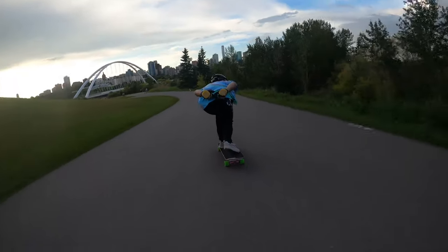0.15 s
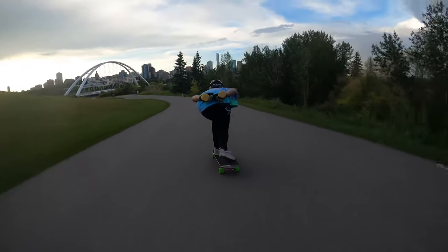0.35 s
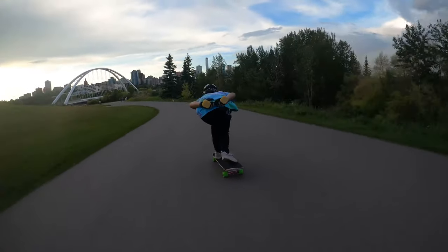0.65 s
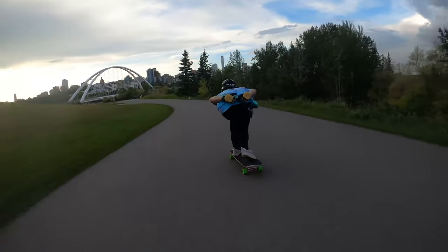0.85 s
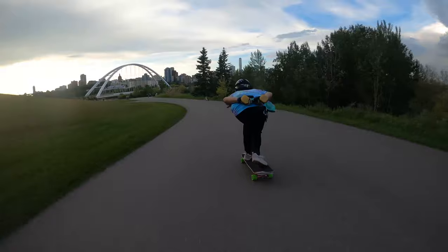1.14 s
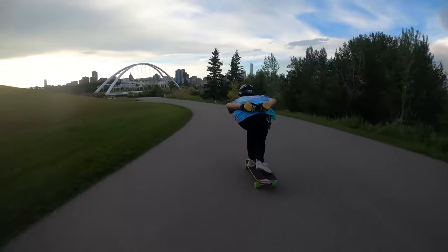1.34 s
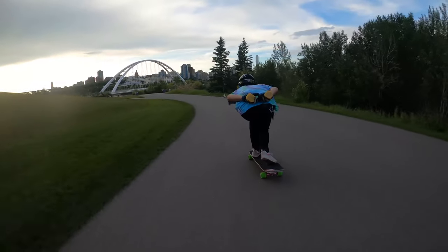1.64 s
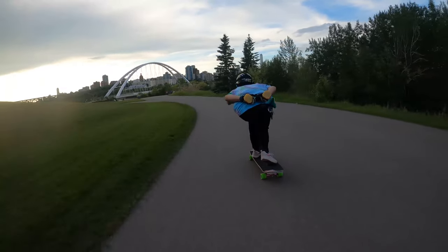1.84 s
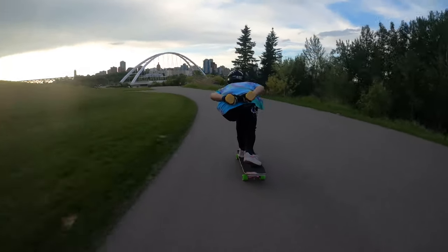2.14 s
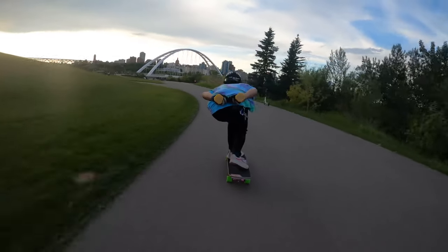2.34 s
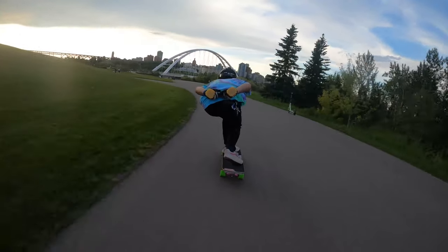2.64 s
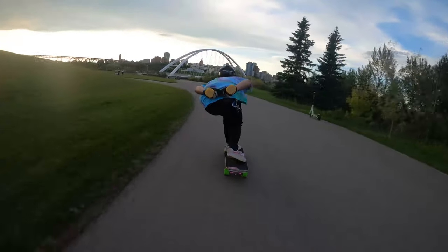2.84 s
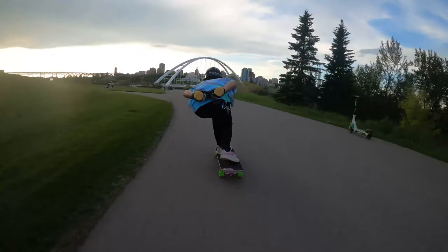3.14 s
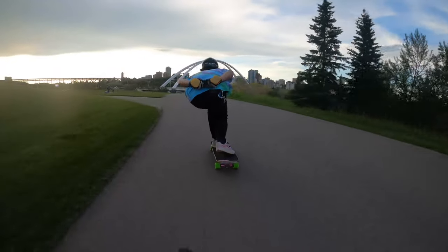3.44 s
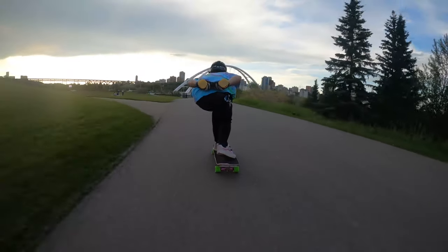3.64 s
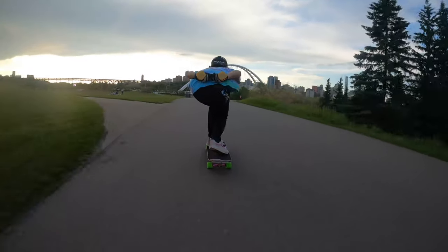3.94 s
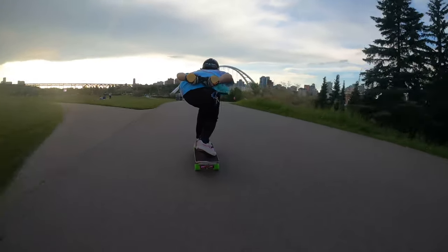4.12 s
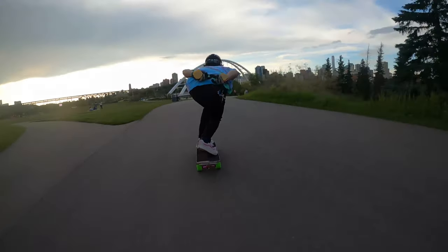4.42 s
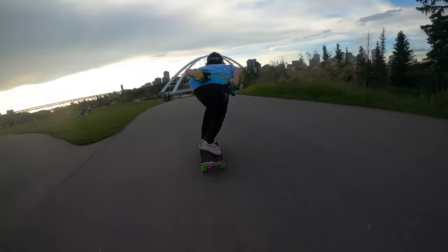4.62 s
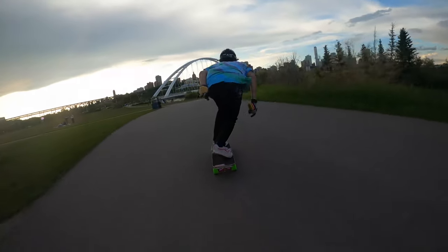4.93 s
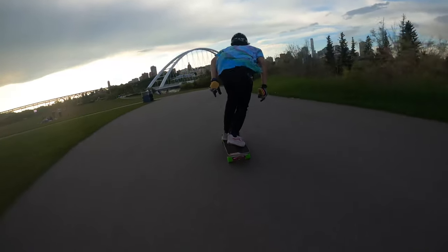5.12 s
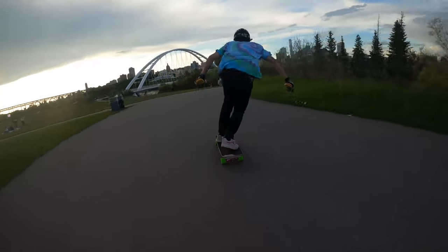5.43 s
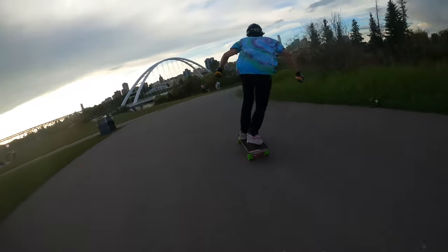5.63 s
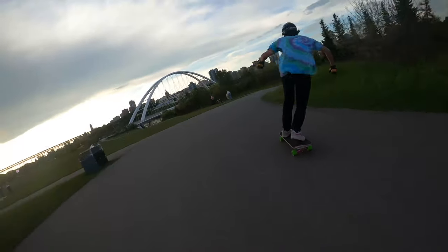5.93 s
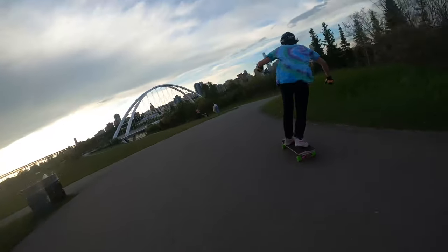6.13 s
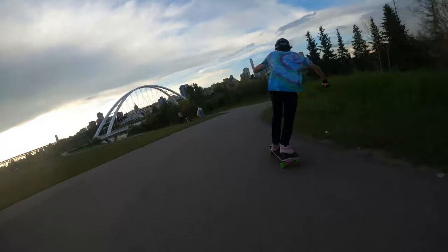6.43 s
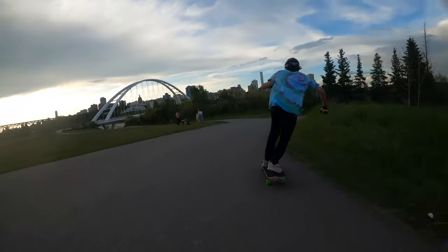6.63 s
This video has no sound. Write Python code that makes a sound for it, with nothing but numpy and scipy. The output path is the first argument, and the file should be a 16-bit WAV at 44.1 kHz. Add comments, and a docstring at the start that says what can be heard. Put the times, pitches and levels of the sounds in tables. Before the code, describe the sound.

Fast longboard wheels on rough asphalt make a continuous, hollow roar with a thin hiss and low hum. Wind hits the small moving camera's microphone throughout: fluttering with brighter gusty rushes in the first second, easing a little, then heavy low thumps in the middle, another rushing gust past five seconds, and looser buffets to the end. Open air, close stereo, no echo.

```python
"""Longboard at speed in a headwind

Urethane longboard wheels roar over coarse asphalt, heard by a small camera that rides along.
The roar, rasp and hiss are patchy noise, coloured by the cavity resonances of two microphone ports.
A low wheel hum and a resonant deck drone lie beneath; a faint fizz of fine grit flickers on top.
Headwind is lumpy noise that rumbles, flutters and flaps in buffets; side gusts add a brighter rush."""
import sys
import numpy as np
from scipy import signal
from scipy.fft import rfft, irfft, next_fast_len
from scipy.io import wavfile
from scipy.ndimage import uniform_filter1d, map_coordinates

SR = 44100
rng = np.random.default_rng(int(sys.argv[2]) if len(sys.argv) > 2 else 0)


def store_wav(level_fs):
    """Save 16-bit WAV to argv[1]."""
    pcm = np.round(np.clip(np.atleast_2d(level_fs), -1, 1) * 32767)
    wavfile.write(sys.argv[1], SR, pcm.T.astype(np.int16))


N = 298557


def amp(db):
    """Amplitude for a level in dB."""
    return 10 ** (np.asarray(db) / 20)


def unit(x):
    """x scaled to an rms of 1."""
    return x / np.sqrt(np.mean(x ** 2) + 1e-20)


def along(points, hz):
    """(Hz, value) points read on a logarithmic frequency axis."""
    point_hz, values = np.transpose(points)
    return np.interp(np.log(hz + 1), np.log(point_hz + 1), values)


def curves(rows):
    """One value per sample for each column after the time."""
    s, *columns = np.transpose(rows)
    return [np.interp(np.arange(N) / SR, s, column) for column in columns]


def wobble(rate):
    """A smooth random curve with rate knots a second."""
    knots = rng.standard_normal(int(N * rate / SR) + 4)
    return map_coordinates(knots, [np.arange(N) * rate / SR])


def filtered(x, response):
    """x through a complex response of frequency, padded so that its tail does not wrap round."""
    size = next_fast_len(N + SR // 2)
    return irfft(rfft(x, size) * response(np.fft.rfftfreq(size, 1 / SR)), size)[..., :N]


def pair(x, alike):
    """Two unrelated signals mixed to left and right with the correlation alike(Hz)."""
    def mid_and_side(hz):
        turn = np.arccos(np.clip(alike(hz), -1, 1)) / 2
        return np.array([np.cos(turn), np.sin(turn)])

    mid, side = filtered(x, mid_and_side)
    return np.array([mid + side, mid - side])


def puffs(spectrum, alike, lumps_db):
    """Stereo noise of rms 1 that comes in lumps."""
    lumpy = amp(lumps_db) * rng.standard_normal((2, N))
    noise = pair(lumpy, lambda hz: alike + 0 * hz)
    return unit(filtered(noise, lambda hz: amp(along(spectrum, hz))))


def joined(*levels_db):
    """Levels of sounds that play together, summed as powers."""
    return 10 * np.log10(sum(amp(db) ** 2 for db in levels_db))


def milliseconds():
    """A column of times in seconds, one every millisecond."""
    return np.arange(0, N / SR, .001)[:, None]


def per_sample(ms_values):
    """Values given every millisecond, read once a sample."""
    return np.interp(np.arange(N) * 1000 / SR, np.arange(len(ms_values)), ms_values)


def bells(peak_s, length_s):
    """Bell-shaped swells, one column each; the length is the width at half height."""
    return np.exp(-4 * np.log(2) * ((milliseconds() - peak_s) / length_s) ** 2)


def random_field(shape, bins, frames):
    """Random gains over frequency and time, smoothed over some bins and frames, rms 1."""
    field = uniform_filter1d(rng.standard_normal(shape), size=bins, axis=0)
    return unit(uniform_filter1d(field, size=frames, axis=1))


def lean(hz, shift, centre_hz, span_hz):
    """A tilt around a centre: a positive shift lifts the upper flank and lowers the other."""
    side = (hz[:, None] - centre_hz) / span_hz
    return shift * side * np.exp(-side ** 2 / 2)


# Where the hiss resonance leans. Each row: time in seconds, nominal centre in Hz.
HISS_CENTRE = [(0.0, 3150), (0.07, 3340), (0.13, 3140), (0.38, 3220), (0.41, 3080), (0.7, 3220),
               (1.02, 3240), (1.11, 3030), (1.15, 3260), (1.26, 3070), (1.68, 3220), (3.81, 3120),
               (5.09, 3250), (5.37, 3150), (5.79, 3330), (6.77, 3080)]


def road(patchy_db, centre_hz):
    """Dense stone impacts under four wheels: patchy noise whose roar and hiss lean with their centres."""
    hz, t, z = signal.stft(rng.standard_normal((2, N)), SR, nperseg=512)
    patches_db = patchy_db * random_field(z.shape[1:], bins=6, frames=10)
    roar_shift = (np.interp(t, np.arange(N) / SR, centre_hz) - 1040) / 100
    hiss_shift = (np.interp(t, *np.transpose(HISS_CENTRE)) - 3200) / 100
    lean_db = lean(hz, 7 * roar_shift, 1050, 280) + lean(hz, 2.5 * hiss_shift, 3200, 420)
    return signal.istft(z * amp(patches_db + lean_db), SR, nperseg=512)[1][:, :N]


# Wavering strands in the roar, and the same in the hiss resonance: depth, centre, reach.
STRAND_DB, STRAND_HZ, STRAND_SPAN_HZ = 1.5, 1040, 340
RING_DB, RING_HZ, RING_SPAN_HZ = 2, 3200, 500


def strands(x):
    """Narrow, slowly wandering ridges of gain in roar and hiss, as the wheels' tread rings unevenly."""
    hz, _, z = signal.stft(x, SR, nperseg=2048)
    ridges = random_field(z.shape[1:], bins=2, frames=5)

    def bell(centre, span):
        return np.exp(-((hz[:, None] - centre) / span) ** 2)

    depth_db = STRAND_DB * bell(STRAND_HZ, STRAND_SPAN_HZ) + RING_DB * bell(RING_HZ, RING_SPAN_HZ)
    return signal.istft(z * amp(depth_db * ridges), SR, nperseg=2048)[1][:, :N]


# Wheel noise as each port hears it. Each row: frequency in Hz, relative level in dB per Hz.
LEFT_PORT = [(500, -39.5), (780, -8.5), (900, -2.5), (975, 0), (1065, -1.5), (1160, -1), (1260, -7),
             (1500, -19), (1800, -34.5), (2239, -30), (2550, -26), (2800, -20.5), (3030, -22.5),
             (3330, -19.5), (3500, -23.5), (3780, -31), (4306, -37), (4700, -38.5), (5200, -39.5),
             (5600, -41.5), (6029, -46), (6800, -47.5), (7665, -49.5), (8354, -62.5), (10000, -73),
             (14500, -105)]
RIGHT_PORT = [(500, -47.5), (780, -12), (900, -4), (975, -2), (1065, -3), (1160, -3), (1260, -9),
              (1600, -25), (2067, -24.5), (2497, -46.5), (2850, -35.5), (3350, -33), (3780, -36),
              (4134, -38.5), (4600, -31.5), (4995, -30.5), (5200, -33.5), (5450, -38.5), (6029, -46),
              (6804, -48), (7924, -74), (10000, -79.5), (14500, -105)]
# Phase between the ports. Each row: frequency in Hz, lead of the left port in radians.
PORT_LEAD = [(500, .1), (800, .2), (1810, 0), (2330, -1.7), (2580, -1.8), (3530, .2), (4130, .5),
             (5430, 3.8), (5700, 6.28)]
# Likeness of the ports' noise. Each row: frequency in Hz, left-right correlation before the phase lead.
PORT_ALIKE = [(700, 1), (1750, .96), (2150, .7), (2600, .93), (3600, .94), (4250, .55), (4700, .72),
              (5300, .45), (5750, 1), (6600, .97), (7500, .35)]


def through_ports(x):
    """Each port's cavity resonance colours the wheel noise, with a phase lead between the two."""
    def ports(hz):
        colour = amp([along(LEFT_PORT, hz), along(RIGHT_PORT, hz)])
        return colour * np.exp(.5j * np.outer([1, -1], along(PORT_LEAD, hz)))

    return filtered(pair(x, lambda hz: along(PORT_ALIKE, hz)), ports)


# Loose grit spat from under the wheels. Each row: peak in seconds, rise of the hiss in dB (minus dips).
SPITS = [(.055, 2), (.19, -2), (.307, 3.5), (.487, 2.5), (.802, 4), (.93, 3), (1.317, 5.5), (1.948, 5),
         (2.802, 3.5), (3.452, 2.5), (4.676, 7), (4.975, 4), (5.828, 6), (5.9, 3), (6.203, -2), (6.472, 5),
         (6.601, 7)]
SPIT_S = .02


def spits():
    """Short swishes of spat grit: brief changes of the hiss level, in dB."""
    s, rise_db = np.transpose(SPITS)
    return per_sample(bells(s, SPIT_S) @ rise_db)


# Lower edge of the hiss over the rest. Each row: time in seconds, gain in dB.
SHOULDER = [(0, -2), (.5, 2), (.9, -1.5), (1.3, -2), (2, -0.5), (2.4, -2), (2.8, 0), (3.6, 0), (4.6, -2.5),
            (5.5, -1.5), (6, 0), (6.4, 1.5), (6.77, -2.5)]
# Top of the hiss over the rest. Each row: time in seconds, gain in dB.
SHEEN = [(0, 0), (.3, 1.5), (0.7, 1.5), (1.2, -0.5), (2.2, 5), (2.8, 2), (3.5, 5), (4.6, 1.5), (5, 0.5),
         (5.4, 4.5), (5.75, 0.5), (6.1, -2), (6.77, 2.5)]


def hiss(heard, below):
    """The treble of the wheel noise, its lower edge and top moving apart from its body."""
    top = heard - below(3900)
    body = heard - below(2290) - top
    edge = below(3000) - below(2265)
    body = body + (amp(*curves(SHOULDER)) - 1) * edge
    return unit(amp(spits()) * body + amp(*curves(SHEEN)) * top)


# Deck drone while rolling. Each row: time in seconds, level in dB midway between the two ports.
DRONE = [(0.0, -35), (0.28, -40), (1.39, -50), (2.13, -54), (4.83, -39.5), (5.45, -37), (6.13, -33.5),
         (6.4, -32), (6.47, -22), (6.53, -30.5), (6.77, -33)]
DECK_HZ, DECK_WIDTH_HZ = 596, 120  # resonance of the wooden deck
DECK_SHAKEN_DB = -26  # what the flaps add to the drone, relative to their own level


def deck_drone():
    """The wooden deck rings as a resonance on noise, in phase at both ports and slightly louder on the left."""
    def resonance(hz):
        damping = 1j * hz * DECK_WIDTH_HZ
        return (damping / (DECK_HZ ** 2 - hz * hz + damping)) ** 2

    _, _, flap_db = buffets()
    level_db = joined(*curves(DRONE), flap_db + DECK_SHAKEN_DB)
    drone = unit(filtered(rng.standard_normal(N), resonance))
    return amp(level_db + 0.99 * wobble(8)) * drone * amp([[.8], [-.8]])  # left and right gains in dB


# Spectrum of the low hum. Each row: frequency in Hz, relative level in dB per Hz.
HUM = [(150, -39), (300, -2), (450, 1.5), (650, -5.5), (850, -14), (1500, -64)]
# Strength of the hum. Each row: time in seconds, level in dB.
HUM_LEVEL = [(0, -31), (1.1, -33.5), (1.6, -34), (2.3, -33), (3.3, -34), (3.9, -33), (4.03, -31),
             (4.4, -37), (4.54, -36.5), (4.8, -39), (5.6, -31.5), (5.9, -37.5), (6.4, -38.5), (6.77, -30.5)]


def hum(texture_db):
    """Low hum of the rolling wheels: band-shaped noise, the same at both ports."""
    level_db, = curves(HUM_LEVEL)
    return amp(level_db + texture_db) * puffs(HUM, 1.0, lumps_db=0.54 * wobble(25))


# Rolling. Each row: time in seconds, roar level in dB, nominal centre the roar leans towards in Hz,
# rasp level in dB, hiss level in dB.
ROLL = [(0.0, -21, 1064, -30.5, -35.5), (0.26, -23, 1068, -46.5, -40), (0.7, -20.5, 1103, -43, -41),
        (0.82, -23, 1052, -40, -38.5), (1.13, -24, 1060, -40, -39), (1.21, -23, 1040, -39, -36),
        (1.34, -19.5, 1033, -37.5, -38), (1.45, -23.5, 1030, -37, -37), (1.6, -22, 1028, -36.5, -37.5),
        (1.95, -23, 1010, -38, -39), (2.4, -24, 950, -32, -40), (2.52, -23.5, 970, -32, -39),
        (2.58, -23, 1045, -33, -37), (2.95, -21, 986, -31.5, -37), (3.18, -21, 1028, -35.5, -41),
        (3.51, -22, 1070, -36.5, -40.5), (4.16, -21, 1090, -40, -40), (4.56, -24, 1022, -39.5, -39),
        (4.84, -26, 985, -38, -40.5), (4.97, -22.5, 1027, -34, -38), (5.3, -22.5, 1060, -44.5, -42.5),
        (5.47, -21, 1083, -45, -42), (5.57, -20, 1087, -40, -41), (5.68, -22, 1105, -39, -39),
        (5.82, -23, 1077, -37.5, -38), (6.1, -21, 1100, -36, -37.5), (6.3, -19.5, 1095, -36, -37.5),
        (6.48, -21.5, 1076, -33.5, -38.5), (6.77, -22, 1040, -34.5, -41.5)]


def wheels():
    """Roar, rasp and hiss of the tyres through the two ports, with the deck and the hum along."""
    roar_db, centre_hz, rasp_db, hiss_db = curves(ROLL)
    heard = through_ports(strands(road(0.74, centre_hz)))

    def below(edge_hz):
        return filtered(heard, lambda hz: 1 / (1 + (hz / edge_hz) ** 12))

    texture_db = 0.097 * wobble(17) + 0.24 * wobble(30)  # coarser and finer stretches of asphalt
    roar = amp(roar_db + texture_db) * unit(below(1403))
    rasp = amp(rasp_db + texture_db) * unit(below(1996) - below(1442))
    hissing = amp(hiss_db + texture_db + 0.37 * wobble(9.8)) * hiss(heard, below)
    return roar + hissing + rasp + deck_drone() + hum(texture_db)


# Wind buffets. Each row: peak in seconds, length in seconds (width at half power), rumble level in dB,
# flutter level in dB, flap level in dB.
BUFFETS = [(0.061, 0.026, -15, -21, -26), (0.125, 0.07, -17.5, -37, -37), (0.182, 0.018, -13, -27, -17),
           (0.246, 0.028, -22, -14, -26), (0.375, 0.055, -35, -17.5, -27), (0.434, 0.016, -30, -21, -22),
           (0.491, 0.018, -28, -14, -20.5), (0.637, 0.041, -23, -23, -27), (0.763, .025, -28, -25, -24),
           (0.88, 0.03, -27, -11, -21.5), (0.958, 0.019, -21, -22, -21), (0.996, 0.014, -21, -18, -19),
           (1.092, 0.041, -23, -16, -20.5), (1.366, 0.033, -19, -19, -31), (1.523, 0.13, -15, -32, -29),
           (1.724, 0.057, -16, -18, -25.5), (2.044, 0.058, -18, -22.5, -27),
           (2.287, 0.055, -26, -26.5, -22.5), (2.375, .035, -23, -24, -23), (2.454, 0.064, -25, -22, -21.5),
           (2.512, 0.037, -26, -29, -18.5), (2.632, 0.044, -12.5, -26, -26), (2.71, 0.028, -20, -33, -32),
           (2.828, 0.032, -14, -31, -23), (2.895, 0.061, -18.5, -29, -21), (2.963, 0.034, -13, -29, -23.5),
           (3.06, 0.013, -11.5, -17, -29), (3.126, 0.031, -10, -30, -18), (3.188, 0.035, -28, -19.5, -18),
           (3.317, 0.044, -14, -24.5, -26.5), (3.365, 0.039, -10, -16, -18.5), (3.41, 0.022, -18, -21, -36),
           (3.459, 0.023, -18, -10, -16), (3.516, 0.021, -20, -14.5, -17.5), (3.594, 0.03, -10, -28, -18),
           (3.699, 0.047, -15, -16, -20.5), (3.799, 0.026, -12.5, -16, -21.5),
           (3.867, 0.045, -20, -23, -22), (3.963, 0.032, -13.5, -18.5, -22.5),
           (4.082, 0.034, -14, -17.5, -28.5), (4.196, 0.019, -9, -21, -20),
           (4.248, 0.027, -19.5, -11.5, -18), (4.328, 0.04, -12, -17.5, -15),
           (4.42, 0.055, -15.5, -22, -16), (4.474, 0.034, -16.5, -20, -19),
           (4.603, 0.07, -16.5, -22, -22.5), (4.714, 0.04, -17, -24, -21),
           (4.837, 0.056, -18.5, -19, -25.5), (4.986, 0.033, -11, -21, -25), (5.02, .025, -36, -28, -29),
           (5.14, 0.068, -14, -23, -27), (5.257, 0.074, -33, -18, -20.5), (5.354, 0.063, -18, -19, -24),
           (5.47, 0.13, -31, -16, -21), (5.694, 0.039, -23, -27, -29), (5.745, 0.016, -31, -25, -23.5),
           (6.09, 0.063, -21, -24, -30.5), (6.25, .08, -23, -29.5, -32), (6.46, 0.032, -14, -22.5, -26.5),
           (6.53, 0.02, -18, -18.5, -34), (6.628, 0.035, -19, -18, -26.5), (6.692, 0.021, -20, -23, -26),
           (6.747, 0.044, -18, -23.5, -24)]


def buffets():
    """Rumble, flutter and flap levels of the buffets, each a bell-shaped swell of power."""
    s, length, *levels_db = np.transpose(BUFFETS)
    swells = bells(s, length)
    return [per_sample(10 * np.log10(swells @ amp(db) ** 2 + 1e-12)) for db in levels_db]


# Side gusts. Each row: start in seconds, length in seconds, rush level in dB.
GUST = [(0.0, 0.085, -39), (0.045, .02, -31), (0.315, 0.5, -33.5), (0.81, 0.33, -41), (0.096, 0.17, -28),
        (0.322, 0.035, -25.5), (0.395, 0.043, -27.5), (0.48, 0.028, -22.5), (0.508, 0.024, -22.5),
        (0.554, .13, -30), (0.61, 0.015, -31), (0.638, 0.043, -24.5), (0.695, 0.016, -28),
        (0.749, 0.031, -22.5), (0.853, 0.032, -26), (0.88, .03, -29.5), (0.946, .022, -30),
        (0.982, .025, -31), (1.084, 0.021, -24.5), (1.122, .015, -29), (1.32, 0.019, -34),
        (1.5, 0.017, -35), (1.654, .025, -39), (2.107, 0.011, -39), (2.295, .02, -37), (2.563, 0.045, -41),
        (2.712, 0.029, -39), (2.966, .04, -35), (3.17, 0.045, -31), (3.585, 0.017, -29), (3.96, 0.018, -26),
        (4.326, 0.021, -26), (4.428, 0.011, -28), (4.464, 0.011, -25), (4.713, 0.026, -24),
        (4.827, 0.027, -43), (4.95, .09, -32), (4.99, 0.02, -28), (5.087, 0.056, -31.5),
        (5.193, 0.12, -28.5), (5.294, 0.019, -28), (5.343, 0.47, -27.5), (5.47, 0.29, -31),
        (5.5, .045, -30), (5.62, 0.04, -32)]
GUST_EDGE_S = 0.011  # rise and fall of a gust
CALM_RUSH_DB = -38  # the rush between gusts


def gusts():
    """Level of the rush: every gust rises, holds and falls over the calm."""
    s, length, db = np.transpose(GUST)
    t = milliseconds()
    shape = np.clip(np.minimum(t - s, s + length - t) / GUST_EDGE_S + .5, 0, 1)
    gust_db = 10 * np.log10(shape ** 2 @ amp(db) ** 2 + 1e-12)
    return per_sample(joined(CALM_RUSH_DB, gust_db))


# Steady headwind. Each row: time in seconds, strength in dB, left-over-right lean in dB.
WIND = [(0.0, -21, -3), (0.4, -20.5, -3.5), (0.95, -23.5, -3), (1.22, -25, 1), (1.9, -23, 1),
        (2.4, -21, 1.5), (2.78, -24, 0.5), (3.1, -21, 2), (3.6, -27, 1.5), (3.9, -28, 0.5), (4.02, -31, 2),
        (4.15, -27.5, 1), (4.53, -28, 0), (5.05, -26.5, 0), (5.3, -30, -3.5), (5.72, -20, -4.5),
        (5.9, -30, 1.5), (6.15, -29, 0.5), (6.4, -26.5, 1.5), (6.77, -26.5, 3.5)]
# Spectra of the four wind sounds. Each row: frequency in Hz, relative level in dB per Hz.
RUMBLE = [(8, -32), (22, -2.5), (50, 0.5), (100, -3), (200, -21), (400, -79), (800, -120)]
FLUTTER = [(40, -31.5), (100, -1), (160, 2), (250, -7), (400, -29.5), (800, -65.5), (2000, -120)]
FLAP = [(100, -40), (220, 0.5), (300, -0.5), (500, -7), (800, -13), (1300, -30), (3000, -120)]
RUSH = [(300, -26), (700, 8), (1400, 5), (1800, 0.5), (2100, -3), (2300, -12), (2550, -14.5), (4000, -49.5),
        (7000, -120)]
STEADY_RUMBLE_DB, RUMBLE_FOLLOWS = -19, 0.68  # rumble between buffets; share of the headwind's swing
FLAP_UNDER_DB = 4.5  # steady flap under the steady flutter
OVERLOAD_DB = -1  # the ports' membranes flatten pushes near this size, which sharpens the thumps


def wind():
    """Eddies thump both ports at once; the lumps that flutter also carry the rush of a side gust."""
    steady_db, lean_db = curves(WIND)
    thump_db, beat_db, slap_db = buffets()
    swing_db = RUMBLE_FOLLOWS * (steady_db - steady_db.mean())
    rumble_db = joined(STEADY_RUMBLE_DB + swing_db, thump_db)
    flutter_db = joined(steady_db, beat_db)
    flap_db = joined(steady_db - FLAP_UNDER_DB, slap_db)

    eddies = 0.094 * wobble(22) + 0.6 * wobble(45)
    rush_lumps_db = 0.48 * eddies + 0.34 * wobble(70) + 2.0 * wobble(220) + 1.8 * wobble(500)
    flap_lumps_db = 2 * eddies + 0.9 * np.array([wobble(30), wobble(25)])
    rumble = amp(rumble_db) * puffs(RUMBLE, 0.92, lumps_db=0.18 * wobble(8.2))
    flutter = amp(flutter_db) * puffs(FLUTTER, 0.93, lumps_db=2 * eddies)
    rush = amp(gusts()) * puffs(RUSH, 0.92, lumps_db=rush_lumps_db)
    flap = amp(flap_db) * puffs(FLAP, 0.88, lumps_db=flap_lumps_db)

    pushed = (rumble + flutter + flap) * amp([lean_db / 2, -lean_db / 2])
    limit = amp(OVERLOAD_DB)
    return limit * np.tanh(pushed / limit) + rush


# Fine grit in the top treble. Each row: time in seconds, level in dB.
GRIT = [(0.0, -74), (0.16, -80), (0.4, -89), (0.95, -81.5), (2.9, -80.5), (3.5, -89), (4.96, -79),
        (5.45, -87.5), (5.7, -81), (5.87, -73), (6.25, -69.5), (6.55, -72.5), (6.77, -84)]


def grit():
    """A faint flickering fizz at the top of the range: band-shaped noise with a fast random level."""
    level_db, = curves(GRIT)
    ticks = rng.standard_normal((2, N)) * amp(1.2 * wobble(340) + .5 * wobble(25))
    band = [(4000, -120), (7000, -19), (8000, 2.5), (9500, 3.5),
            (12000, -5), (13200, -10), (14500, -19.5)]  # (Hz, relative dB per Hz)
    spread = pair(ticks, lambda hz: 0.48 + 0 * hz)
    return amp(level_db) * unit(filtered(spread, lambda hz: amp(along(band, hz))))


def scene():
    """Rolling wheels, wind and fine grit together."""
    return wheels() + wind() + grit()


FADE_IN_S, TOP_HZ = 0.004, 14500  # opening fade; band limit
CEILING = 0.85  # amplitude towards which the loudest thumps round off


def record(dry):
    """A fast gain control holds the wind thumps down, peaks round off and the band limit cuts the top."""
    power = np.abs(uniform_filter1d(np.mean(dry ** 2, axis=0), size=SR // 40))
    over_db = np.maximum(10 * np.log10(power + 1e-12) + 17, 0)  # excess over -17 dB
    held = dry * amp(-0.2 * uniform_filter1d(over_db, size=SR // 100))
    held = held * np.clip(np.arange(N) / SR / FADE_IN_S, 0, 1)
    rounded = held / (1 + np.abs(held / CEILING) ** 8) ** (1 / 8)
    return filtered(rounded, lambda hz: hz < TOP_HZ)


dry = scene()
out = record(dry)
store_wav(out)
```